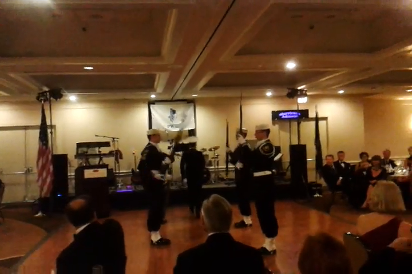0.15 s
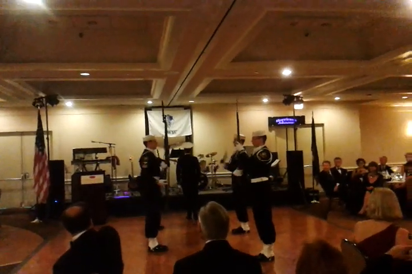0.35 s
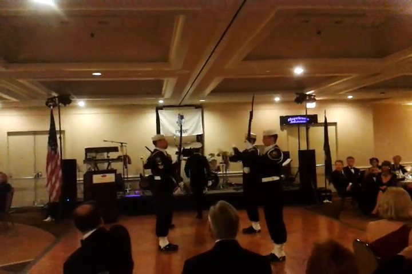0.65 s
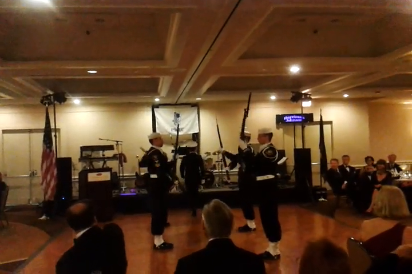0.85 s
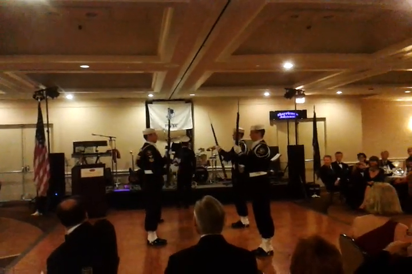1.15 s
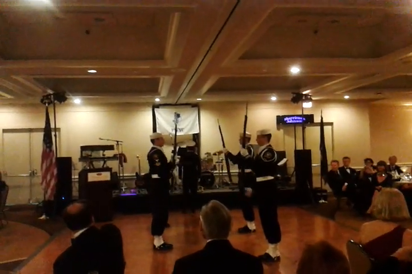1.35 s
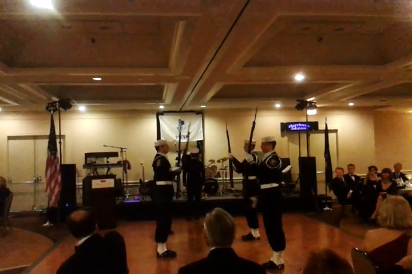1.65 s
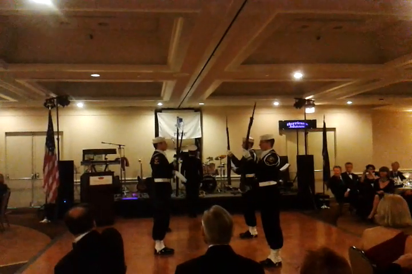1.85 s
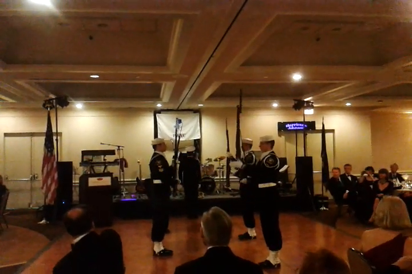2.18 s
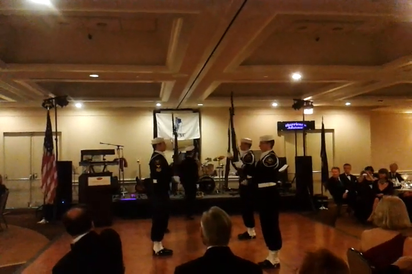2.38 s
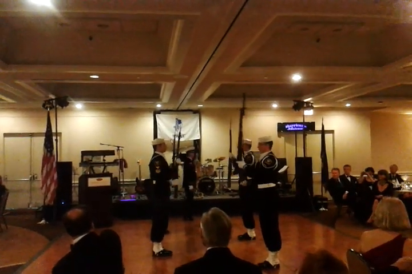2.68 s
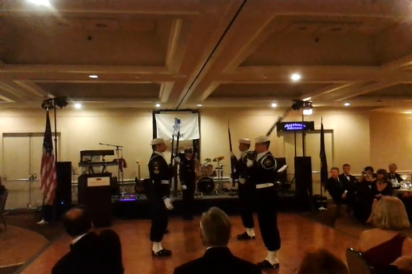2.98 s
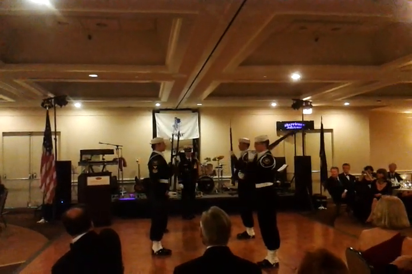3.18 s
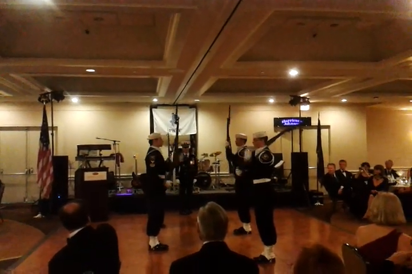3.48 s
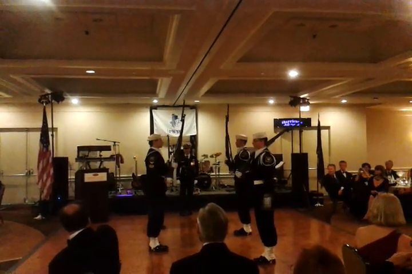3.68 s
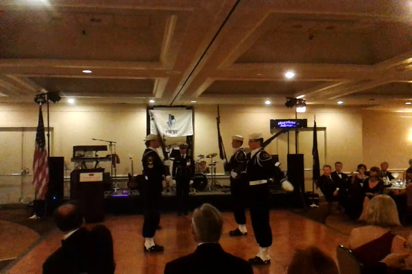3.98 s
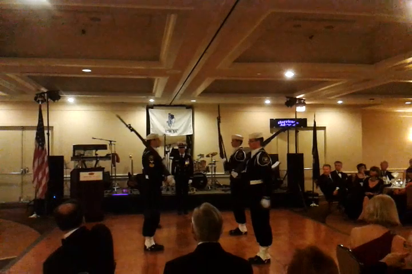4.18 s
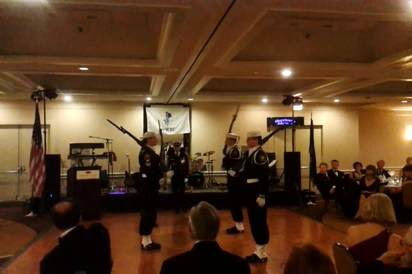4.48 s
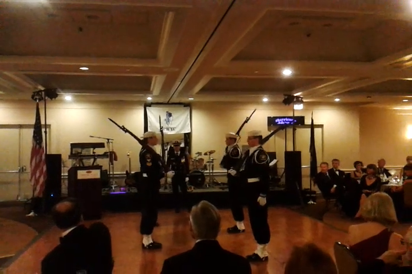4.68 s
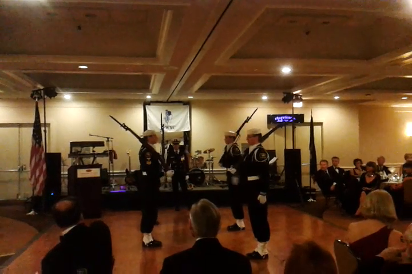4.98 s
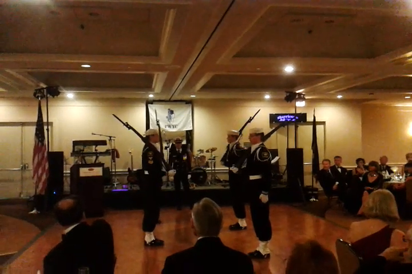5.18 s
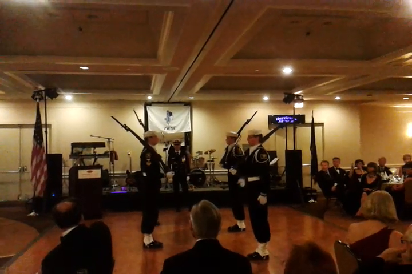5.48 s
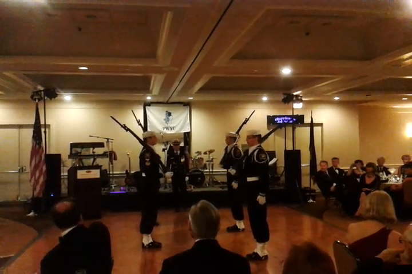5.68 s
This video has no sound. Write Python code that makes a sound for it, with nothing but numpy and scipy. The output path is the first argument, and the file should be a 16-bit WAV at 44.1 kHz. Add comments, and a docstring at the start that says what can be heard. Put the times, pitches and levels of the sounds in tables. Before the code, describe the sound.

In a banquet hall, one loud floor slam opens a sequence of irregular rifle handling: hard wooden slaps with metal rattle in the first two seconds, then quieter taps, clicks and paired catches, with dull heel knocks between and at the end. Each blow gets a brief roomy answer. Soft air noise settles behind. Single small distant microphone, mono, dull at the very top.

```python
"""Banquet hall, hard dance floor: a rifle drill team, some metres from one small microphone.
A soft tap, then a rifle butt slams on the floor; slaps and catches of rifles, more taps, clicks and
heel strikes follow. Each blow is a burst of noise contacts that rings resonant peaks and is answered by
a noise-built hall. A faint sole squeak (gliding sine) and a sleeve swish (band noise) are heard too;
behind lies filtered noise, the hush of air and diners."""
import sys
import numpy as np
from scipy import signal
from scipy.io import wavfile
from scipy.ndimage import uniform_filter1d

SR = 44100
rng = np.random.default_rng(int(sys.argv[2]) if len(sys.argv) > 2 else 0)


def master(y):
    """Save y as 16-bit WAV."""
    cut = np.clip(np.atleast_2d(y).T, -1, 1)
    pcm = np.round(cut * 32767)  # scale
    wavfile.write(sys.argv[1], SR, pcm.astype(np.int16))


N = 257979

# In all blow tables, levels are before the band trims and describe the bands: bass, mid, treble.
# The butt on the floor: t/s, mid level/dB, treble re mid/dB, wood knock f/Hz, metal clack f/Hz
BUTT_SLAM = (0.185, -13, -10, 1570, 4100)
# Broad colour of the slammed floor: f/Hz, level/dB
FLOOR_COLOUR = [(35, -25), (70, -7.5), (115, 5.5), (170, 5), (260, 2.5), (400, -0.5), (650, -10),
                (900, -19), (1300, -16.5), (1550, -9.5), (2050, -14.5), (2500, -27), (4100, -15),
                (7000, -25.5)]
# Ringing of the floor panels, also under the heels: f/Hz, width/Hz, level/dB before ring gain and spread
FLOOR_MODES = [(122, 15, -1), (141, 24, 4), (186, 21, -2.5), (235, 31, -0.5), (255, 25, 1), (373, 30, 0)]


def butt_slam():
    """One hard, short contact makes the floor panels boom."""
    out = np.zeros(N)
    s, db, treble_db, knock_hz, clack_hz = BUTT_SLAM
    start_s, sound = blow(
        s, db, FLOOR_COLOUR, FLOOR_MODES, bass_db=-7.5, treble_db=treble_db,
        knock_hz=knock_hz, clack_hz=clack_hz, contact_s=.0013, wet_db=-1.5,
        ring_db=5.5, knock_db=-3, knock_width=260, clack_db=-1.5, trim_db=[-1.5, -9, -7])
    add(out, start_s, sound)
    return out


# Slaps and catches: t/s, mid level/dB, bass re mid/dB, treble re mid/dB, wood knock f/Hz, metal clack f/Hz
RIFLE_HITS = [(0.688, -18, -22, 8.5, 1160, 3840), (0.713, -27, -17, 2, 1150, 5280),
              (1.382, -29.5, -20, 1.5, 1060, 6400), (1.396, -15.5, -24, 2.5, 1200, 5630),
              (1.721, -25, -18, -2, 1170, 5990), (1.969, -25.5, -11.5, -3, 1350, 3130),
              (2.248, -44, -8, 0, 1750, 3840), (2.437, -52, -10, -5, 1090, 3700),
              (2.548, -29.5, -30, -7, 1050, 5630), (2.763, -40.5, -22, 2, 1260, 3500),
              (3.282, -34.5, -25, -1.5, 990, 3460), (3.321, -33, -14, 0, 1180, 3030),
              (3.844, -29, -15, -0.5, 1100, 5790), (3.86, -29, -16, -0.5, 1080, 5700),
              (5.03, -40.5, -8.5, -1.5, 1090, 5460), (5.07, -30, -26, -5, 1290, 5960)]
# Broad colour of a struck rifle, also under the gloves: f/Hz, level/dB
RIFLE_COLOUR = [(50, -31), (150, -18.5), (350, -13.5), (650, -11), (880, -5.5), (1150, -3.5), (1550, -5.5),
                (2100, -5.5), (2600, -10.5), (3700, -6), (5500, -6.5), (6900, -4.5), (8000, -11.5)]
# Ringing of stock, barrel and bayonet, also for gloves and fittings:
# f/Hz, width/Hz, level/dB before ring gain and spread
RIFLE_MODES = [(1120, 167, -1.5), (2150, 43, -5), (3100, 110, -3), (3560, 79, -8), (4270, 33, -6.5),
               (4270, 300, -2.5), (5155, 150, -4), (5730, 280, 1), (6290, 74, -4.5), (7200, 74, -7),
               (6990, 100, -10.5), (7410, 28, -10)]


def rifles():
    """Slaps and catches ring the wooden stocks, with the clack of the metal parts."""
    out = np.zeros(N)
    for s, db, bass_db, treble_db, knock_hz, clack_hz in RIFLE_HITS:
        start_s, sound = blow(
            s, db, RIFLE_COLOUR, RIFLE_MODES, bass_db, treble_db,
            knock_hz, clack_hz, contact_s=.0023, wet_db=-.3,
            ring_db=4, knock_db=4, knock_width=220, clack_db=5, trim_db=[-8.5, -9, -7.5])
        add(out, start_s, sound)
    return out


# Heel strikes: t/s, mid level/dB, bass re mid/dB, treble re mid/dB, floor knock f/Hz,
# hall re direct level/dB before the nearness of loud blows
HEELS = [(0.853, -33, -23, -4.5, 856, 2.2), (0.945, -42, -4.5, -12, 1300, 5.9),
         (1.473, -29, -12, -1.5, 700, 4.5), (4.28, -55.5, 1.5, 0.5, 414, 1.7),
         (4.419, -31, -12.5, -9, 820, 2.5), (5.49, -27, -15, -15.5, 670, 9),
         (5.772, -25, -15.5, -6.5, 450, 1.7)]
# Broad colour of a heel on the floor: f/Hz, level/dB
HEEL_COLOUR = [(50, -16), (100, -7.5), (150, -2.5), (260, -2), (420, 1.5), (650, -2), (850, -3),
               (1300, -2.5), (1900, -9), (2600, -17), (3600, -16), (6000, -16.5), (8000, -34)]


def heels():
    """Heels ring the floor panels, each with its own share of hall."""
    out = np.zeros(N)
    for s, db, bass_db, treble_db, knock_hz, wet_db in HEELS:
        start_s, sound = blow(
            s, db, HEEL_COLOUR, FLOOR_MODES, bass_db, treble_db,
            knock_hz, clack_hz=3400, contact_s=.0024, wet_db=wet_db,
            ring_db=-0.5, knock_db=0.5, knock_width=220, clack_db=-3.5, trim_db=[-3.5, -9.3, -9])
        add(out, start_s, sound)
    return out


# Gloved hands on bare wood: t/s, mid level/dB, treble re mid/dB, wood knock f/Hz
GLOVE_TAPS = [(0.096, -48, -12, 1490), (0.975, -32, -15, 1250), (1.078, -31, -23, 1040),
              (1.258, -43, -12, 1150), (2.678, -36, -9, 894), (2.7, -33, -14, 1150),
              (2.905, -46, -11, 1270), (3.271, -36, -6, 926), (3.687, -38, -16, 1300),
              (3.778, -41, -20, 1050)]


def gloves():
    """Soft, short taps on the stocks, weak in bass and treble."""
    out = np.zeros(N)
    for s, db, treble_db, knock_hz in GLOVE_TAPS:
        start_s, sound = blow(
            s, db, RIFLE_COLOUR, RIFLE_MODES, bass_db=-22, treble_db=treble_db,
            knock_hz=knock_hz, clack_hz=3650, contact_s=.0018, wet_db=-4.5,
            ring_db=0, knock_db=1, knock_width=260, clack_db=6, trim_db=[-9, -9, -9.5])
        add(out, start_s, sound)
    return out


# Light clicks of sling swivels and bolts: t/s, treble level/dB, mid re treble/dB
FITTING_CLICKS = [(0.862, -33, 0.5), (1.065, -44, -3), (1.172, -46, 0), (1.273, -38.5, -13),
                  (2.687, -39, 3), (3.071, -31.5, -13), (3.19, -47, 3), (3.25, -38, -15), (3.597, -47, -5),
                  (3.612, -47, 5), (3.696, -43, -8), (4.368, -41.5, -1), (5.26, -53, -12)]
# Broad colour of the small metal parts: f/Hz, level/dB
FITTING_COLOUR = [(100, -23), (700, -17.5), (1200, 1), (2500, -7), (3700, -1), (5000, -5.5), (6500, 0),
                  (8000, -9.5)]


def fittings():
    """Loose metal parts click on their own, with hardly any knock from the stock."""
    out = np.zeros(N)
    for s, db, mid_db in FITTING_CLICKS:
        start_s, sound = blow(
            s, db + mid_db, FITTING_COLOUR, RIFLE_MODES, bass_db=-20, treble_db=-mid_db,
            knock_hz=1200, clack_hz=6400, contact_s=.0015, wet_db=-.3,
            ring_db=1.5, knock_db=-10, knock_width=220, clack_db=-9, trim_db=[-12, -11, -8.5])
        add(out, start_s, sound)
    return out


# A sole twists: t/s, length/s, start f/Hz, end f/Hz, peak level/dB before the hall
SQUEAK = (5.705, .04, 2685, 2593, -57)


def squeak():
    """A twisting sole squeaks: one faint, slightly falling sine tone in the hall."""
    s, length_s, start_hz, end_hz, db = SQUEAK
    hz = np.linspace(start_hz, end_hz, int(length_s * SR))
    phase = 2 * np.pi * np.cumsum(hz) / SR
    tone = amp(db) * np.hanning(len(hz)) * np.sin(phase)
    out = np.zeros(N)
    add(out, s, signal.fftconvolve(tone, sum(hall(wet_db=0))))
    return out


# Cloth brushes past: t/s, length/s, low f/Hz, high f/Hz, RMS level/dB before the fade and the hall
SLEEVE = (4.84, .07, 2000, 4300, -58)


def sleeve():
    """A uniform sleeve swishes as a rifle swings to the shoulder: band noise that swells and fades."""
    s, length_s, low_hz, high_hz, db = SLEEVE
    band = signal.butter(2, [low_hz, high_hz], "band", fs=SR, output="sos")
    rub = signal.sosfilt(band, rng.standard_normal(int(length_s * SR)))
    swish = amp(db) * np.hanning(len(rub)) * rub / rms(rub)
    out = np.zeros(N)
    add(out, s, signal.fftconvolve(swish, sum(hall(wet_db=-2))))
    return out


# Spectrum of the hush: f/Hz, relative level/dB per Hz
HUSH = [(20, -26.5), (50, -4.5), (90, -5.5), (130, -2), (260, -1.5), (450, -1.5), (700, -5), (1200, -7.5),
        (2300, -11.5), (4000, -14), (6500, -17), (8800, -26), (11000, -69.5)]
HUSH_DB = -55.5  # RMS level before the stir
STIR_DB, SETTLE_S = 3.5, 1.6  # extra level at the start, and its time constant


def hush(patchy_db=1.0):
    """Ventilation and seated diners: noise with drifting patches, louder at first as the diners settle."""
    hz, t, z = signal.stft(rng.standard_normal(N), SR, nperseg=2048, noverlap=1536)
    patches = uniform_filter1d(rng.standard_normal(z.shape), size=24, axis=0)
    patches = uniform_filter1d(patches, size=10, axis=1)
    z *= amp(read(HUSH, hz)[:, None] + patchy_db * patches / rms(patches))
    air = signal.istft(z, SR, nperseg=2048, noverlap=1536)[1][:N]
    stir_db = STIR_DB * np.exp(-np.arange(N) / SR / SETTLE_S)
    return amp(HUSH_DB + stir_db) * air / rms(air)


LEAD_S = .012  # a blow begins this long before its main contact
BASS_EDGE_HZ, TREBLE_EDGE_HZ = 560, 2600  # crossovers between bass, mid and treble


def blow(s, level_db, colour, modes, bass_db, treble_db, knock_hz, clack_hz, contact_s, wet_db,
         ring_db, knock_db, knock_width, clack_db, trim_db,
         clack_width=450, detune=0.006, spread_db=2.0, softness=0.38, nearness=0.087):
    """The contacts ring a body in the hall; weight and hardness of the blow set bass and treble."""
    # each grip and striking point favours other modes
    peaks = []
    for (hz, width, db), (level, pitch) in zip(modes, rng.standard_normal((len(modes), 2))):
        peaks.append((hz * (1 + detune * pitch), width, db + ring_db + spread_db * level))
    # a soft, dull blow brings out the knock of the wood
    peaks.append((knock_hz, knock_width, knock_db - softness * treble_db))
    peaks.append((clack_hz, clack_width, clack_db))

    def body(f):
        ringing = sum(amp(db) ** 2 / (1 + (2 * (f - hz) / width) ** 2) for hz, width, db in peaks)
        return amp(read(colour, f)) * np.sqrt(1 + ringing)

    # the loudest blows are nearest, so driest
    paths, tail = hall(wet_db - nearness * max(level_db + 33.5, 0))
    # the tail gathers sound from all directions, so the pattern of the contacts is lost in it
    lead = round(LEAD_S * SR)
    arrivals = np.pad(tail, (lead, 0))
    add(arrivals, 0, signal.fftconvolve(paths[:SR // 20], contacts(contact_s)))
    sound = coloured(arrivals, body)
    bass, rest = split(sound, BASS_EDGE_HZ)
    bands = [bass, *split(rest, TREBLE_EDGE_HZ)]
    # each band is levelled by its RMS from the lead to 1/30 s after the main contact
    attack = lead + SR // 30
    gains = amp(level_db + np.array([bass_db, 0, treble_db]) + trim_db)
    return s - LEAD_S, sum(gain * band / rms(band[:attack]) for gain, band in zip(gains, bands))


def contacts(contact_s, chatter=1.39, touch_db=-18, touch_s=0.0032,
             rattle_db=-11, rattle_s=0.044, count=4):
    """Force of one blow: a light first touch, the main burst of tiny contacts, then loose parts bouncing."""
    t = np.arange(SR // 10) / SR - LEAD_S
    burst = np.maximum(t, 0) / max(contact_s, .0002)
    shape = burst * np.exp(1 - burst)
    shape += amp(touch_db) * np.exp(-abs(t) / touch_s)
    for delay in rng.uniform(0.0056, .055, count):
        bounce = np.exp(-abs(t - delay) / 0.0016)
        shape += amp(rattle_db) * np.exp(-delay / rattle_s) * bounce
    grains = rng.standard_normal(len(t))
    # a power above 1 makes the grains spikier
    force = np.sign(grains) * abs(grains) ** chatter * shape
    return force / np.linalg.norm(force)


# Time of the hall's main decay by 60 dB: f/Hz, t/s
HALL_T60 = [(100, 0.77), (260, 0.75), (700, 0.41), (1800, 0.54), (4800, 0.44), (8000, 0.29)]


def hall(wet_db, build_s=.0025, bass_cycles=1.2, early_db=-13, late_db=-28, late_stretch=3.7,
         count=6, size=32768):
    """Direct sound with a few bounces off floor and ceiling, and a dense tail whose bass swells late."""
    hz, t, z = signal.stft(rng.standard_normal(size), SR, nperseg=256)
    swell = 1 - np.exp(-np.outer(hz + 50, t + .002) / bass_cycles)
    fall_db = -60 * t / read(HALL_T60, hz)[:, None]
    # the far end of the hall holds a faint, longer echo
    decay = np.hypot(amp(fall_db), amp(late_db + fall_db / late_stretch))
    tail = signal.istft(z * swell * decay, SR)[1][:size]
    tail *= 1 - np.exp(-np.arange(size) / SR / build_s)
    paths = signal.unit_impulse(size)
    for delay, sign in zip(rng.uniform(.003, .03, count), rng.choice([-1, 1], count)):
        paths[int(delay * SR)] += sign * amp(early_db) * np.exp(-delay / 0.061)
    return paths, amp(wet_db) * tail / np.linalg.norm(tail)


def amp(db):
    """Decibels to gain."""
    return 10 ** (np.asarray(db) / 20)


def rms(x):
    """Root mean square."""
    return np.sqrt(np.mean(x ** 2) + 1e-20)


def read(points, hz):
    """Joins (Hz, value) points on a log-frequency axis."""
    f, value = np.transpose(points)
    return np.interp(np.log(hz + 1), np.log(f + 1), value)


def add(mix, s, sound):
    """Mixes a sound in at time s, which may lie before the start."""
    at = round(s * SR)
    sound = sound[max(-at, 0):]
    part = mix[max(at, 0):][:len(sound)]
    part += sound[:len(part)]


def coloured(x, gain_at, size=6144):
    """Causal minimum-phase filter with the gain gain_at(Hz): peaks ring after the blow, never before."""
    hz = abs(np.fft.fftfreq(size, 1 / SR))
    log_gain = np.log(np.maximum(gain_at(hz), 1e-5))
    taps = np.fft.ifft(np.exp(np.conj(signal.hilbert(log_gain)))).real[:size // 2]
    return signal.fftconvolve(x, taps)[:len(x)]


def split(x, hz):
    """Crossover: the parts below and above hz, each filtered twice for a steeper slope."""
    halves = [signal.butter(2, hz, kind, fs=SR, output="sos") for kind in ("low", "high")]
    return [signal.sosfilt(sos, signal.sosfilt(sos, x)) for sos in halves]


def scene():
    """Everything that reaches the one microphone."""
    blows = butt_slam() + rifles() + heels() + gloves() + fittings()
    return (blows + squeak() + sleeve() + hush())[None]


# Response of the small microphone: f/Hz, level/dB
MICROPHONE = [(30, -4), (6800, -3.5), (7400, -8), (7900, -20), (8600, -24.5), (9200, -29.5)]
EDGE_HZ = 9000  # band limit


def record(dry):
    """A small microphone that loses the top treble, then the band limit."""
    heard = coloured(dry[0], lambda f: amp(read(MICROPHONE, f)))
    band_limit = signal.firwin(511, EDGE_HZ, window=("kaiser", 9), fs=SR)
    return signal.oaconvolve(heard, band_limit, "same")[None]


dry = scene()
out = record(dry)
master(out)
```